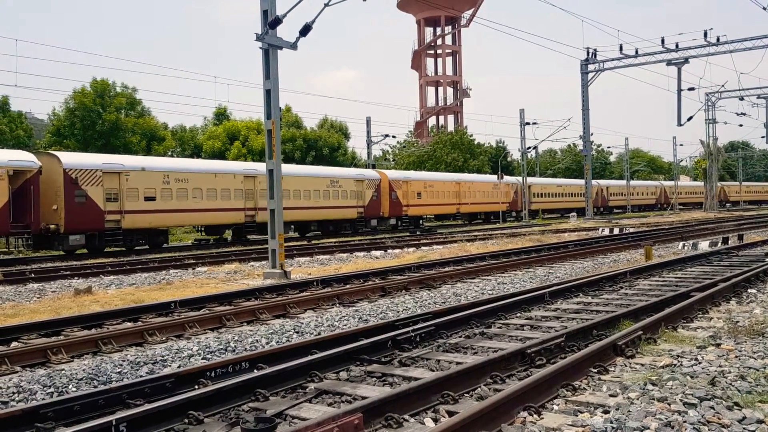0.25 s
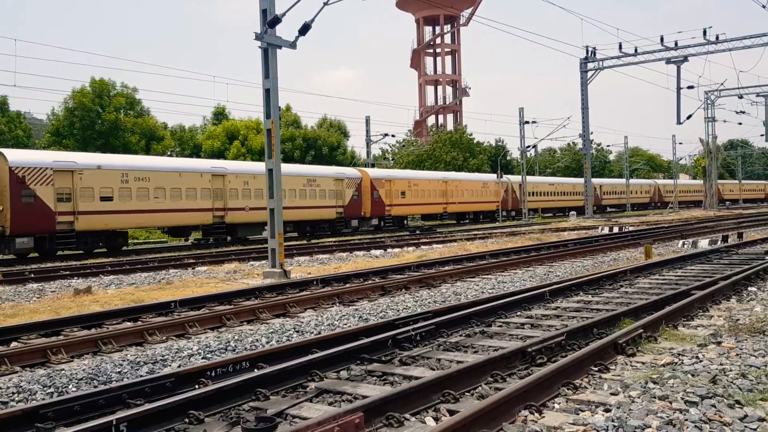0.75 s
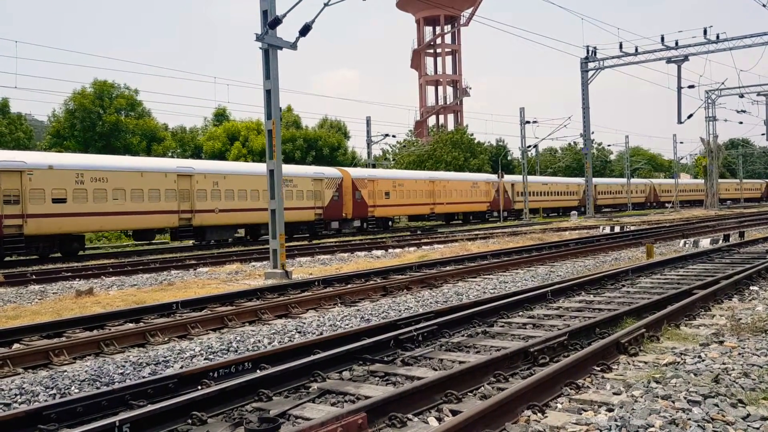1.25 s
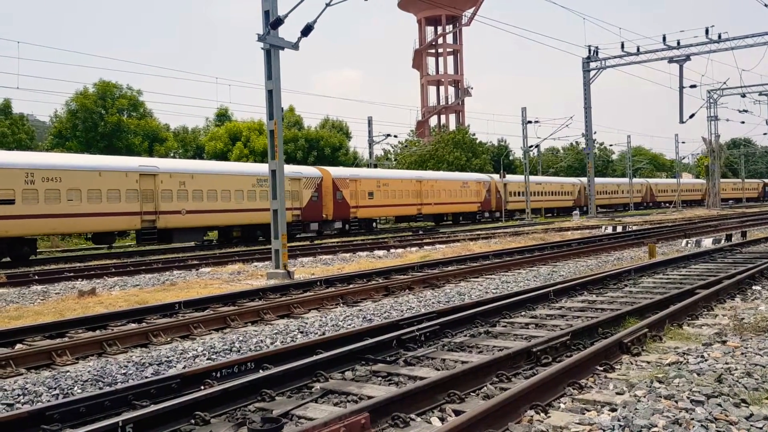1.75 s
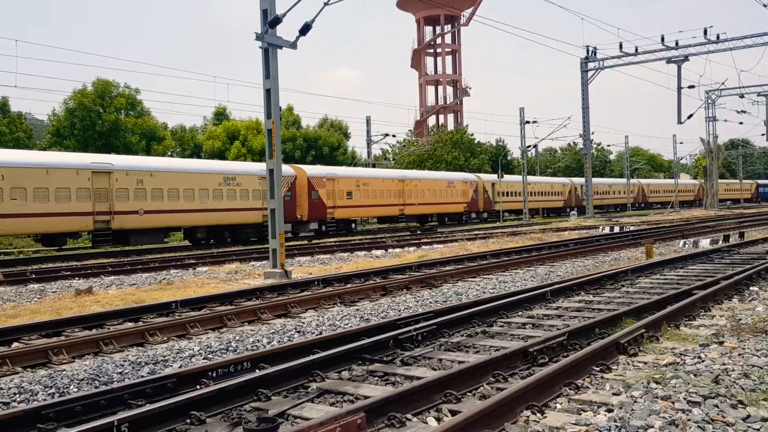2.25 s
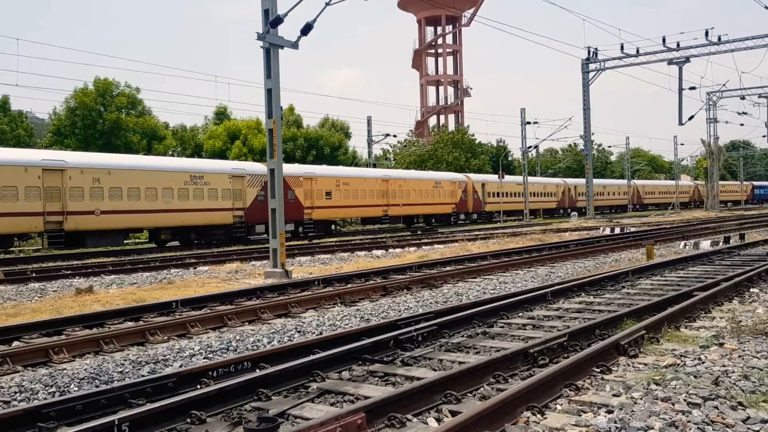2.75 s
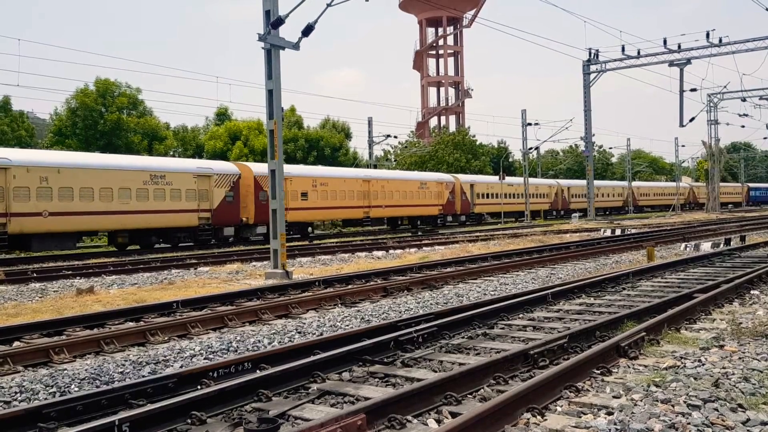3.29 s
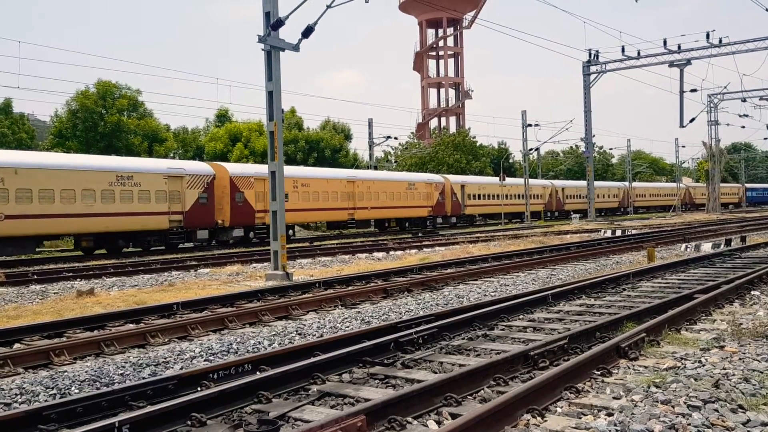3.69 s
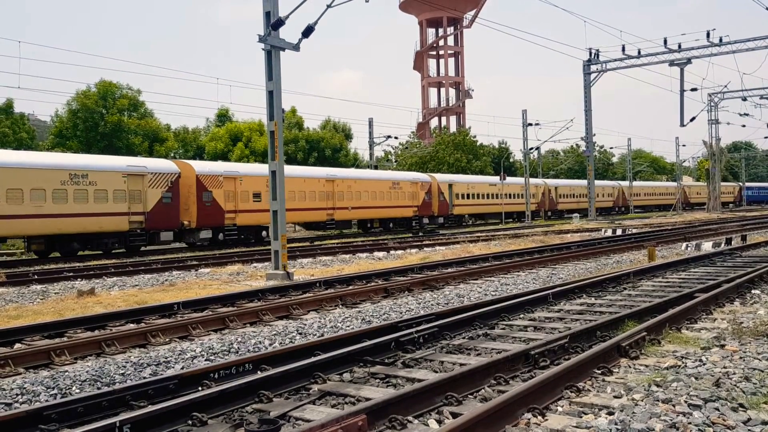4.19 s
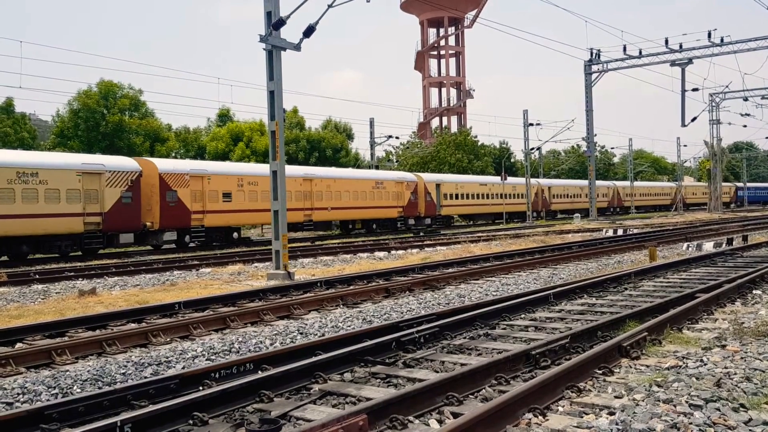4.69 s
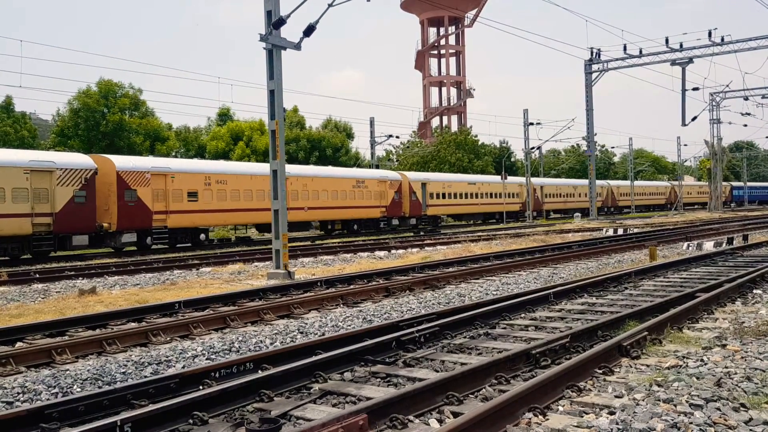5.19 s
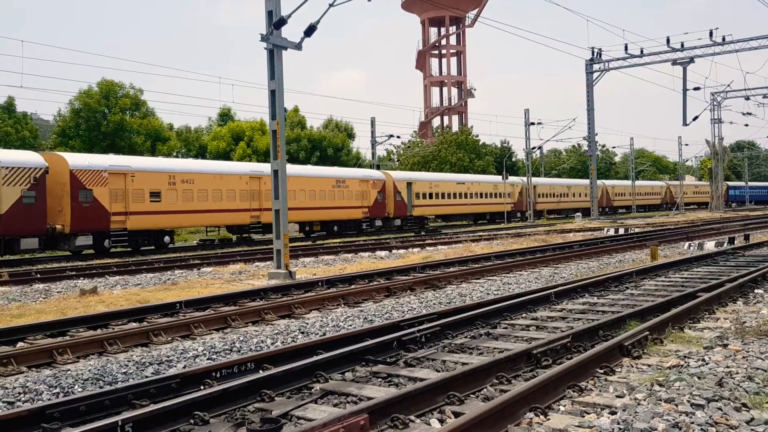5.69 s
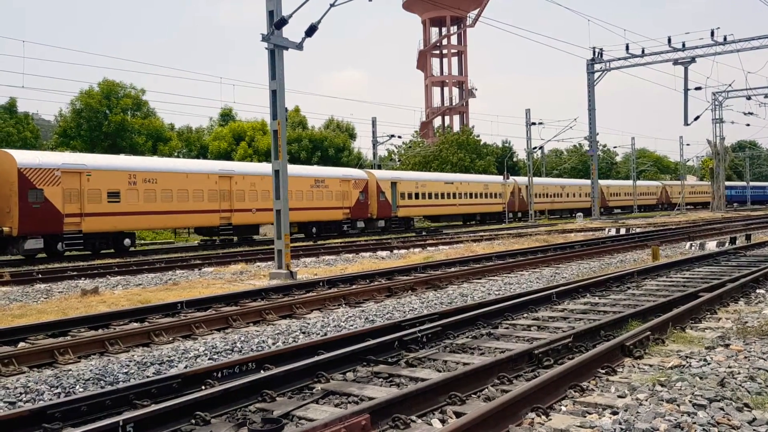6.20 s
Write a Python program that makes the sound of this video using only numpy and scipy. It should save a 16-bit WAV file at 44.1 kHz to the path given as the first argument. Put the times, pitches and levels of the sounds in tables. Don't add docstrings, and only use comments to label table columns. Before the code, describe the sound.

A diesel locomotive rumbles with uneven chugs and a thin turbo whine as rail joints thump, then a two-tone air horn blasts loudly twice.

```python
import sys
import numpy as np
from scipy import signal
from scipy.fft import rfft, irfft, next_fast_len
from scipy.io import wavfile
from scipy.ndimage import uniform_filter1d, map_coordinates

SR = 44100
rng = np.random.default_rng(int(sys.argv[2]) if len(sys.argv) > 2 else 0)


def voltage_ratio(level):
    return 10 ** (np.asarray(level, float) / 20)


def store_wav(level_fs):
    pcm = np.round(np.clip(np.atleast_2d(level_fs), -1, 1) * 32767)
    wavfile.write(sys.argv[1], SR, pcm.T.astype(np.int16))


N = 284443
TIME_S = np.arange(N) / SR
HORN_START_S = 5.588
SIDES = np.array([[1], [-1]])

# t/s, rate/Hz
FIRING_RATE = [
    (0, 93),
    (.8, 83),
    (1.5, 76),
    (2.5, 76),
    (2.9, 81.6),
    (3.5, 85.5),
    (4.5, 75.5),
    (5.6, 70.5),
]
# t/s, level/dB about the mean
LOAD = [(0, 5.5), (.12, 2), (.78, 1.5), (1.1, 0), (2.95, 1.5), (3.4, 1.5), (3.72, -0.5), (3.79, -4),
        (3.86, 0.5), (4.25, -3), (4.33, -0.5), (4.65, -1), (4.71, -4), (4.9, -2), (4.97, -0.5), (5.1, -3.5),
        (5.33, -0.5), (5.58, -3)]


def rms_one(x):
    return x / np.sqrt(np.mean(x ** 2) + 1e-20)


def in_time(rows):
    s, *columns = np.transpose(rows)
    return [np.interp(TIME_S, s, column) for column in columns]


def on_log(points, at):
    places, values = np.transpose(points)
    return np.interp(np.log(at), np.log(places), values)


def drift(rate, size=N):
    r = np.exp(-80 * np.pi * rate / SR)
    noise = rng.standard_normal(size // 40 + 2002)
    slow = signal.lfilter([1], [1, -2 * r, r * r], noise)[2000:]
    return np.interp(np.arange(size) / 40, np.arange(len(slow)), rms_one(slow))


def two_ways(direct, scattered, alike):
    return np.sqrt(1 + alike) * direct + np.sqrt(1 - alike) * scattered * SIDES


def ring(x, hz, width_hz):
    r = np.exp(-np.pi * width_hz / SR)
    feedback = [1, -2 * r * np.cos(2 * np.pi * hz / SR), r * r]
    return signal.lfilter(np.array([1, 0, -1]) * (1 - r * r) / 2, feedback, x)


def beats():
    # t/s, level/dB, length/s
    strong = [(0.158, -12, 0.018), (0.24, -18.5, 0.06), (0.343, -16.5, 0.077), (0.621, -16.5, 0.052),
              (0.804, -13.5, 0.038), (0.986, -16, 0.055), (1.319, -14.5, 0.045), (1.525, -13, 0.056),
              (1.715, -21, 0.084), (1.958, -17, 0.044), (2.173, -19.5, 0.093), (2.38, -16, 0.043),
              (2.561, -24, 0.05), (2.641, -16, 0.027), (2.753, -20, 0.022), (2.864, -13.5, 0.072),
              (2.962, -16, 0.068), (3.174, -16, 0.049), (3.319, -19, 0.1), (3.576, -21.5, 0.033),
              (3.739, -19, 0.041), (3.857, -23, 0.039), (4.196, -27, 0.088), (4.403, -24, 0.015),
              (4.536, -26.5, 0.035), (4.652, -33, 0.043), (4.816, -27.5, 0.031), (5.039, -28.5, 0.069),
              (5.362, -38, 0.037), (5.566, -33.5, 0.092)]
    firings_per_beat = 8.7
    whole = []
    for (s, db, length), (later, later_db, _) in zip(strong, strong[1:]):
        whole.append((s, db, length))
        rate = np.interp(s, *np.transpose(FIRING_RATE))
        steps = max(round((later - s) * rate / firings_per_beat), 1)
        for k in range(1, steps):
            share = k / steps
            plain_db = db + (later_db - db) * share - 2.5 + 2 * rng.standard_normal()
            whole.append((s + (later - s) * share, plain_db, 0.043))
    whole += strong[-1:]
    s, db, _ = np.transpose(whole)
    puff_s = np.append(s[0] * .6, s[:-1] + 0.44 * np.diff(s))
    luck = rng.standard_normal(len(s))
    load_db = np.minimum(np.interp(puff_s, *np.transpose(LOAD)), 0)
    puff_db = np.interp(puff_s, s, db) - 6 + 7 * luck + 4.6 * load_db
    return whole + [(at, level, 0.013) for at, level in zip(puff_s, puff_db)]


def exhaust():
    out, beat = np.zeros((2, N)), np.zeros(N)
    firings = np.cumsum(in_time(FIRING_RATE)[0] * (1 + 0.0382 * drift(4.75))) / SR
    chance = rng.standard_normal((200, 3))
    for (s, peak_db, length), (slip, pan, skew) in zip(beats(), chance):
        at = np.arange(max(int((s - .15) * SR), 0), int((s + .15) * SR))
        width_s = 0.38 * length + 0.00071
        swell = voltage_ratio(peak_db - 1.5) * np.exp(-.5 * ((at / SR - s) / width_s) ** 2)
        phase = 2 * np.pi * (firings[at] + 0.2 * slip) + 0.32 * skew * SIDES
        pulses = np.cos(phase) + voltage_ratio(-23.5) * np.cos(2 * phase)
        pulses += voltage_ratio(-12) * np.cos(phase / 2)
        out[:, at] += swell * pulses * voltage_ratio(.9 * pan * SIDES)
        beat[at] += swell
    return out, beat / (uniform_filter1d(beat, SR // 3) + 0.00072)


def roar(beat):
    free_db = [-38.5, -45.5, -73]
    held_db = [-50, -57, -75]
    follows = [1.73, 0.93, 0.79]
    # f/Hz, level/dB per Hz
    colour = [(30, -20), (60, -3), (130, -10), (250, -18), (480, -24), (680, -21), (900, -29.5),
              (1500, -30.5), (2200, -34.5), (3500, -39), (5000, -45), (6500, -58.5), (11000, -54.5),
              (15000, -54)]
    # f/Hz, share from the engine's side
    likeness = [(40, 0.99), (130, 0.36), (300, 0.43), (700, 0.75), (1500, 0.9), (4000, 0.77), (12000, 0.32)]
    held = np.clip((TIME_S - HORN_START_S - .025) / .05, 0, 1)
    load_db, = in_time(LOAD)
    levels = []
    for db, share, low_db in zip(free_db, follows, held_db):
        moving_db = db + share * load_db
        levels.append(voltage_ratio(moving_db + held * (low_db - moving_db)))
    parts, edges = [0, 0, 0], 28 * 2 ** np.arange(0, 9.3, .4)
    white = rng.standard_normal((2, 2, N))
    for k, (low, high) in enumerate(zip(edges, edges[1:])):
        band = signal.butter(2, [low, high], "band", fs=SR, output="sos")
        direct, scattered = signal.sosfilt(band, white[k % 2])
        hz = np.sqrt(low * high)
        pulsing = on_log([(100, 0.26), (350, .25), (1000, 0.031), (10000, 0.059)], hz)
        gain = voltage_ratio(on_log(colour, hz) + 1.5 * drift(8.8)) * (1 + pulsing * (beat - 1)).clip(.2)
        part = int(hz > 400) + int(hz > 5000)
        parts[part] = parts[part] + gain * two_ways(direct, scattered, np.clip(on_log(likeness, hz), 0, 1))
    silencer = ring(ring(white[0], 675, width_hz=95), 675, width_hz=190)
    parts[1] = rms_one(parts[1]) + voltage_ratio(-5) * (0.58 + 0.2 * beat) * rms_one(two_ways(*silencer, 0.8))
    dull = signal.sosfilt(signal.butter(8, 12700, fs=SR, output="sos"), parts[2])
    top = signal.sosfilt(signal.butter(8, 12700, "high", fs=SR, output="sos"), parts[2])
    parts[2] = dull + top * voltage_ratio(-6) * np.exp(-(TIME_S / 1.1) ** 2)
    trims_db = [4.5, 3.5, 6.5]
    return sum(voltage_ratio(trim) * level * rms_one(x) for trim, level, x in zip(trims_db, levels, parts))


def wheels():
    # t/s, level/dB, f/Hz
    thumps = [(0.0, -17, 144), (0.034, -18, 188), (0.065, -17.5, 150), (0.59, -27, 236), (0.979, -26, 252),
              (1.302, -29, 153), (1.388, -22.5, 183), (1.581, -28, 152), (2.87, -26, 199),
              (3.152, -24.5, 274), (3.831, -27.5, 182), (4.58, -36, 258), (4.993, -26.5, 280.5),
              (5.298, -33, 455)]
    # t/s, knock level/dB, tick level/dB
    clacks = [(0.018, -54, -56), (2.015, -38.5, -75), (2.46, -42, -68), (2.939, -37.5, -69),
              (3.209, -47, -58), (3.608, -42, -71), (3.869, -43, -58), (4.315, -41, -81), (4.409, -51, -65),
              (4.925, -41, -91), (4.998, -39.5, -78), (5.109, -42, -73), (5.342, -44, -76)]
    out, late = np.zeros(N), np.arange(3000) / SR
    for s, peak_db, hz in thumps:
        envelope = (late / 0.0067) * np.exp(1 - late / 0.0048)
        out[int(s * SR):][:3000] += -voltage_ratio(peak_db) * np.sin(2 * np.pi * hz * late) * envelope
    for (s, knock_db, tick_db), noise in zip(clacks, rng.standard_normal((len(clacks), 3000))):
        knock = rms_one(ring(noise, 1150, width_hz=700)) * np.exp(-late / .022)
        tick = rms_one(ring(ring(noise, 7500, width_hz=4000), 7000, width_hz=5000)) * np.exp(-late / .012)
        out[int(s * SR):][:3000] += voltage_ratio(knock_db + .5) * knock + voltage_ratio(tick_db - 3.0) * tick
    return out


def swells(rows, shaded_db):
    t = np.arange(0, N, 64) / SR
    gain = voltage_ratio(shaded_db)
    for s, db, length in rows:
        gain = gain + voltage_ratio(db) * np.exp(-.5 * ((t - s) / (0.39 * length)) ** 2)
    return np.interp(TIME_S, t, 20 * np.log10(gain))


def turbo():
    # t/s, f/Hz
    speed = [(0.0, 5335), (0.25, 5220), (0.5, 5086), (1.125, 4860), (1.625, 4683), (2.125, 4533),
             (2.75, 4352), (2.89, 4307), (2.97, 4455.0), (3.09, 4418), (3.16, 4467), (3.5, 4546),
             (3.85, 4532), (4.5, 4347), (5.25, 4130), (5.375, 4114), (5.6, 4070)]
    # t/s, level/dB, length/s
    compressor_swells = [(0.0, -52, 0.098), (.44, -43, 0.28), (.72, -53, 0.19), (1.27, -60, .2),
                         (1.98, -56, 0.37), (2.33, -52, 0.35), (2.62, -36.5, 0.37), (2.93, -39.5, 0.053),
                         (3.06, -39.5, 0.19), (3.25, -46.5, 0.095), (3.5, -50.5, 0.25), (3.81, -49, .24),
                         (4.24, -50.5, 0.091), (4.43, -45, .1), (4.62, -57, 0.15), (5.17, -42.5, 0.4),
                         (5.5, -48, 0.11)]
    turbine_swells = [(.16, -46.5, 0.21), (.5, -58, 0.12), (.82, -54, 0.22), (1.19, -39, 0.18),
                      (1.55, -39.5, 0.25), (2.08, -39.5, 0.46), (2.44, -33, 0.25), (2.8, -45.5, 0.23),
                      (2.97, -35, 0.068), (3.09, -31.5, 0.15), (3.24, -38.5, .13), (3.5, -46.5, 0.32),
                      (3.94, -39.5, 0.23), (4.26, -39, 0.24), (4.63, -45.5, 0.17), (4.83, -51.5, 0.28),
                      (5.16, -56, 0.15), (5.52, -45.5, 0.17)]
    third_swells = [
        (.6, -74, 2.9),
        (3.1, -66.5, 1.5),
        (5.4, -71.5, .6),
    ]
    shaded_db = [-88.5, -59]
    hz, = in_time(speed)
    turns = np.cumsum(hz) / SR
    second_db = -63 - 9 * np.maximum(TIME_S - 2.76, 0)
    levels = [swells(compressor_swells, shaded_db[0]), swells(turbine_swells, shaded_db[1]),
              second_db, swells(third_swells, -88)]
    multiples, twinkles_db, smears = [1, 9 / 14, 2, 3], [1.8, 1.8, 3, 3], [.04, .04, .2, .3]
    out = 0
    for k, db, twinkle_db, smear in zip(multiples, levels, twinkles_db, smears):
        apart = 1.2 * (smear - .04) * np.array([drift(20), drift(20)])
        line = np.cos(2 * np.pi * (k * turns + smear * drift(48) + apart))
        own_db = 1.2 * np.array([drift(35), drift(3.2)])
        flutter_db = twinkle_db * (.9 * drift(55) + .8 * drift(9)) + own_db
        out = out + voltage_ratio(db + 2.5 + flutter_db) * line
    wake = 0
    for wave in (np.cos, np.sin):
        wake = wake + np.array([drift(65), drift(67)]) * wave(2 * np.pi * turns)
    wake_db = np.interp(TIME_S, [0, 2.2, 3.2, 5.6], [-61.0, -53.5, -54.0, -58.5])
    held_db = -14 * np.clip((TIME_S - HORN_START_S - .02) / .04, 0, 1)
    return (out + voltage_ratio(wake_db) * two_ways(*wake, 0.4)) * voltage_ratio(held_db)


def bearing(x):
    at = np.arange(N) - 1.1 + .25 * TIME_S
    return np.array([x[0], map_coordinates(x[1], [at], order=4, mode="nearest")])


def reeds():
    # t/s, lack of air 0-1 (under 0 = surplus), high trumpet f/Hz, ground echo on its lowest tone/dB
    first_blast = [
        (5.6, .8, 488.5, 6),
        (5.613, .12, 485, 5),
        (5.665, -0.004, 477, 2.5),
        (5.71, -0.0026, 472.5, -1),
        (5.75, -0.012, 472, 3.5),
        (5.79, 0.085, 471.4, 3.5),
        (5.83, 0.54, 473, -2),
        (5.87, 0.72, 474.5, 0),
        (5.92, 0.88, 471.3, 1),
    ]
    second_blast = [
        (5.958, 0.78, 468, -3),
        (5.989, 0.454, 474.3, -1.5),
        (6.02, 0.036, 475.5, -2),
        (6.109, -0.0089, 470.5, -2),
        (6.19, 0.0049, 467.5, 2),
        (6.25, 0.0025, 468, 3),
        (6.31, 0.035, 466.7, -2.5),
        (6.38, 0.0088, 469, -0.5),
        (6.44, 0.0005, 466, -11),
    ]
    # loss without air/dB, power of the lack
    high_fade = [(11, 2.05), (35.3, 1.86), (31.4, 0.61), (43.2, 0.55)]
    # loss without air/dB, power of the lack
    low_fade = [(8, 3.4), (17, 0.93), (20, 0.56)]
    lack, hz, ground_db = in_time(first_blast + second_blast)
    lack = np.clip(lack, -.1, 1)
    valve_db = -45 * np.clip(1 - (TIME_S - HORN_START_S) / 0.0144, 0, 1)
    high, low = [[valve_db - loss_db * np.sign(lack) * np.abs(lack) ** power for loss_db, power in fade]
                 for fade in (high_fade, low_fade)]
    low_hz = .585 * hz + 7 * lack
    return [hz, high[0] + ground_db] + high[1:], [low_hz] + low


def trumpet(controls, orders, knots, count, waver_db, breath_db):
    start = int(HORN_START_S * SR)
    hz, *change = [c[start:] for c in controls]
    size = len(hz)
    turns = np.cumsum(hz * (1 + 0.00085 * drift(27, size))) / SR
    out = np.zeros((2, size))
    for k in range(1, count + 1):
        place = np.interp(np.log(k), np.log(knots), np.arange(len(knots)))
        low = min(int(place), len(knots) - 2)
        db = on_log(orders, k) + change[low] + (place - low) * (change[low + 1] - change[low])
        waver = drift(15.7, size) + 0.44 * drift(13, size) * SIDES
        paths_db = (1 - np.minimum(change[-1], 0) / 14) * waver_db * k ** 0.15 * waver
        apart = .0022 * k * drift(4, size) * SIDES
        push = .04 - .011 * k ** 1.6
        out += np.sqrt(2) * voltage_ratio(db + paths_db) * np.cos(2 * np.pi * (k * turns + push + apart))
    hiss_band = signal.butter(3, [10300, 14200], "band", fs=SR, output="sos")
    air = signal.sosfilt(hiss_band, rng.standard_normal((2, size)))
    out += voltage_ratio(breath_db + change[-1]) * (1 + np.cos(2 * np.pi * turns)) * two_ways(*air, 0.55)
    return np.pad(out * np.clip(np.arange(size) / 200, 0, 1), ((0, 0), (start, 0)))


def horn():
    # multiple of the lowest, level/dB
    high_orders = [(1, -18.5), (2, -20.5), (3, -29.5), (4, -22), (5, -24), (6, -30.5), (7, -32.5),
                   (9, -31.5), (10, -33), (11, -45.5), (12, -33.5), (14, -41.5), (17, -46), (19, -42),
                   (21, -46), (23, -38.5), (27, -39.5), (30, -47), (33, -49)]
    low_orders = [(1, -36), (2, -39.5), (3, -30.5), (4, -37), (5, -40), (6, -42), (7, -37.5), (8, -38),
                  (9, -39), (11, -43), (14, -44), (26, -60), (40, -70), (54, -75)]
    high_reed, low_reed = reeds()
    high = trumpet(high_reed, high_orders, [1, 4, 11, 25], count=33, waver_db=1.02, breath_db=-36.5)
    low = trumpet(low_reed, low_orders, [1, 3, 9], count=54, waver_db=1.5, breath_db=-63)
    above = signal.butter(4, 640, "high", fs=SR, output="sos")
    sum_tones = signal.sosfilt(above, ring(high, 610, width_hz=900) * low)
    return high + low + voltage_ratio(7) * sum_tones


def yard(x, t60, cut_hz):
    size = int(t60 * SR)
    taps = rng.standard_normal((2, size)) * (rng.random((2, size)) < .01) * voltage_ratio(-60 * np.arange(size) / size)
    taps[:, :int(.03 * SR)] = 0
    taps = signal.lfilter([1], [1, -np.exp(-2 * np.pi * cut_hz / SR)], taps)
    taps = taps / np.sqrt(np.sum(taps ** 2, axis=1, keepdims=True))
    return signal.fftconvolve(x, taps, axes=1)[:, :N]


def scene():
    chuffs, beat = exhaust()
    train = bearing(chuffs + roar(beat) + wheels() + turbo())
    blasts = horn()
    return train + blasts + voltage_ratio(-19.5) * yard(blasts, .6, cut_hz=2200)


def roll_off(x):
    return signal.sosfilt(signal.butter(12, 15670, fs=SR, output="sos"), x)


def record(dry):
    # f/Hz, delay/samples
    port_lag = [(80, 11.0), (400, 18.0), (1200, 20.5), (4400, 21.0), (5200, 18.7), (6000, 18.8),
                (7600, 20.2), (13000, 20.2)]
    # f/Hz, level/dB
    port_balance = [(60, 0), (200, -1), (700, -2), (1300, -3), (2400, -2.5), (4400, 2.5), (8000, -.5)]
    size = next_fast_len(N + 512)
    hz = np.maximum(np.arange(size // 2 + 1) * SR / size, 1)
    tilt_db = on_log(port_balance, hz) / 2
    dips_db = -10 * np.exp(-((hz - 7850) / 260) ** 2) - 3.1 * np.exp(-((hz - 6200) / 800) ** 2)
    colour = voltage_ratio(dips_db) * hz / np.hypot(hz, 40)
    delay = np.exp(-2j * np.pi * hz * on_log(port_lag, hz) / SR)
    ports = colour * np.array([voltage_ratio(tilt_db), voltage_ratio(-tilt_db) * delay])
    mix = irfft(rfft(dry, size) * ports, size)[:, :N]
    return roll_off(np.clip(mix, -1, 1))


dry = scene()
out = record(dry)
store_wav(out)
```